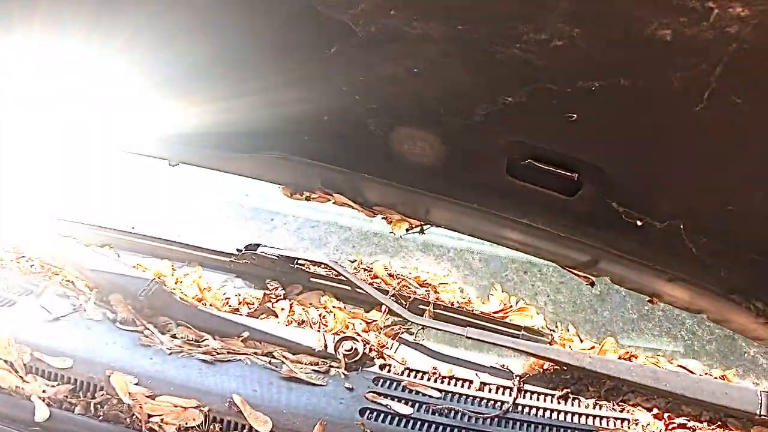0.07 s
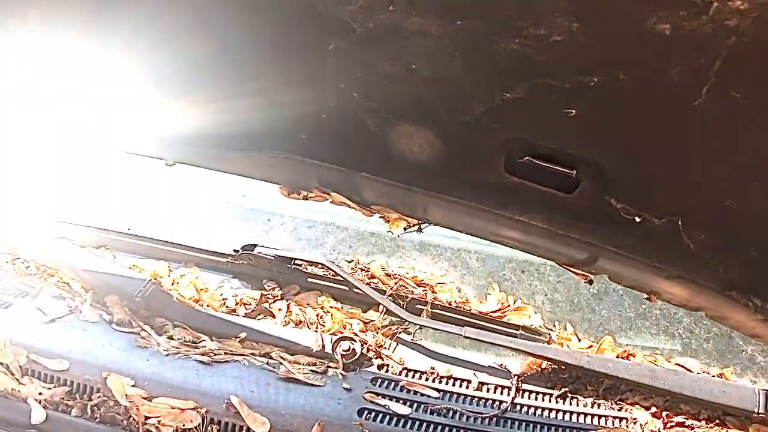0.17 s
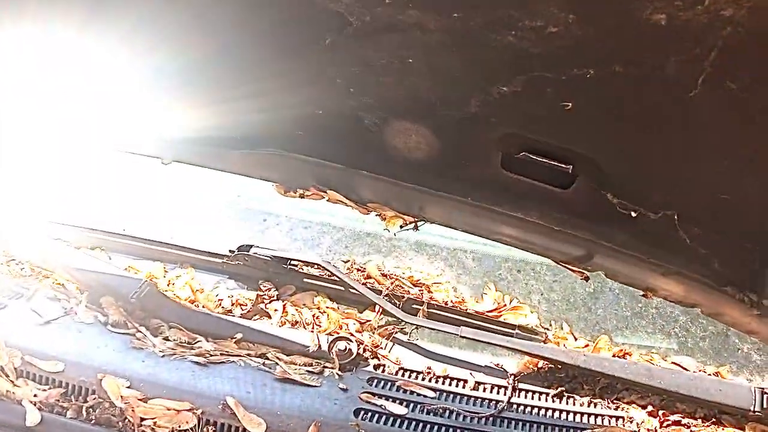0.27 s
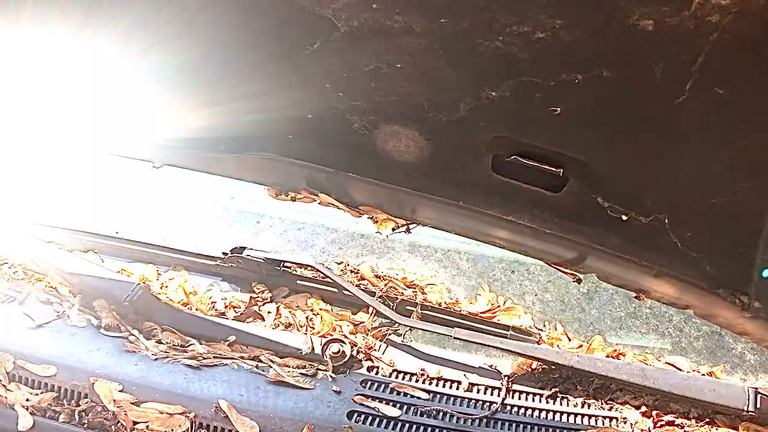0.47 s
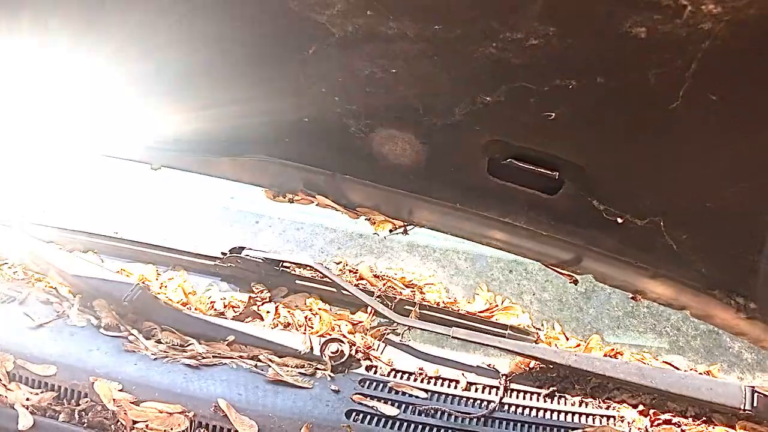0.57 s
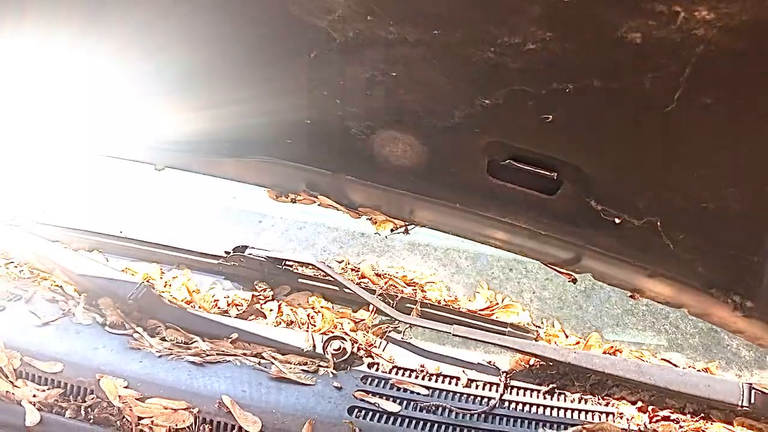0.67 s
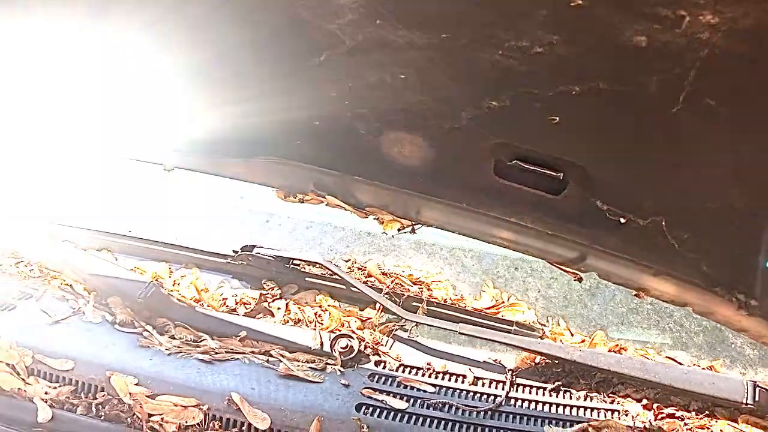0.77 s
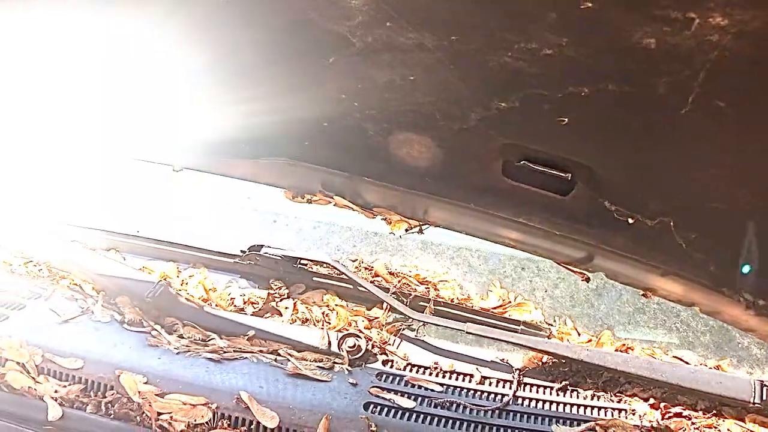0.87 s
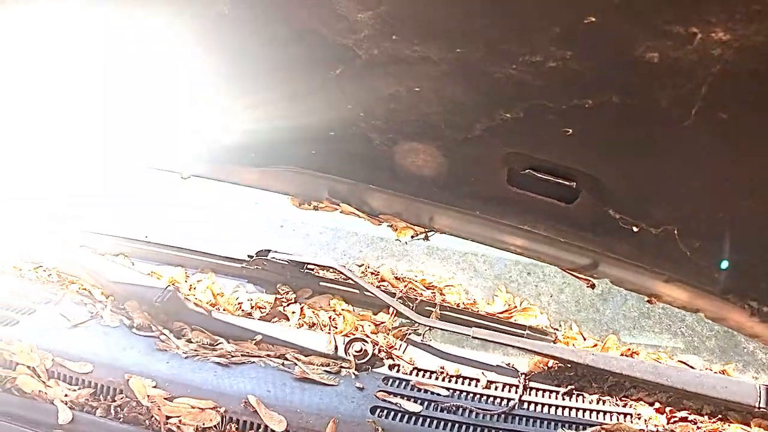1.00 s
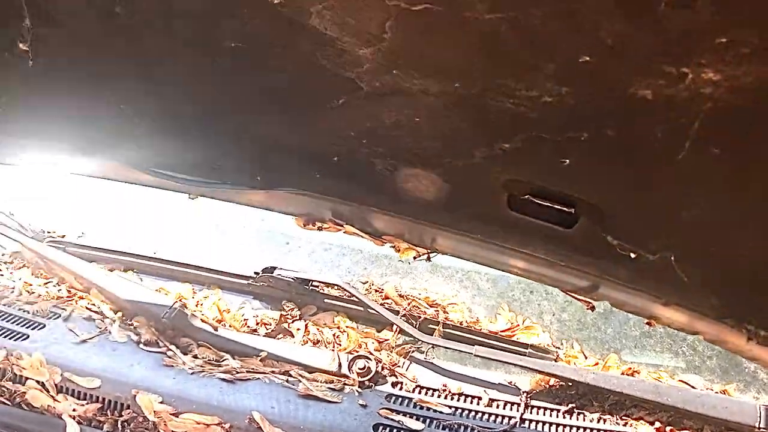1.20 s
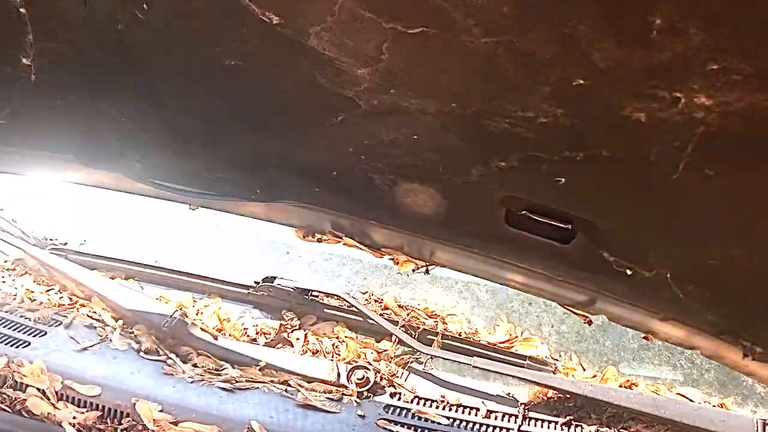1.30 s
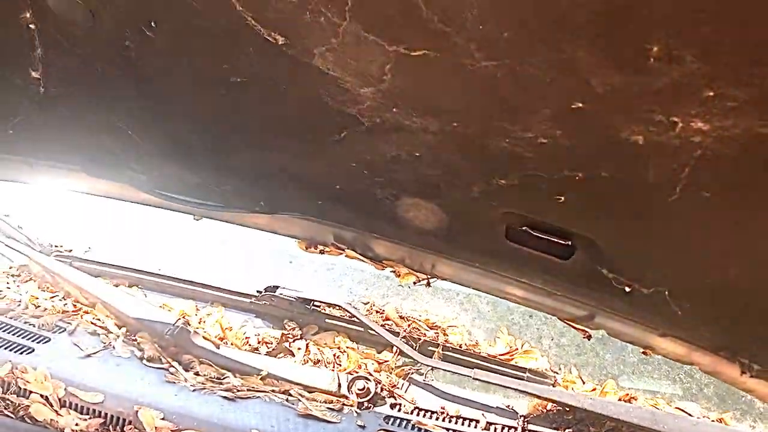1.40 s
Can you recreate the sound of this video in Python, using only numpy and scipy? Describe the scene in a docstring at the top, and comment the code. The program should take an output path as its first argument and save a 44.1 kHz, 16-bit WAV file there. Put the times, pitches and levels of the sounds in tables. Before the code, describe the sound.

A car hood moves close to the microphone: the dry hinge squeaks sharply, the metal panel clunks twice, then bumps softly several times. Behind it is a faint, low outdoor rumble.

```python
"""Car bonnet on a dry hinge

Outdoors, one microphone by the car. The hinge sticks and slips in one sharp squeak, then the panel
shudders, clunks and snaps into place, each blow ringing the same sheet-metal modes. Something slides
with a faint hiss, probably a strut, and a few soft knocks follow. Farther off, a machine hums and
small birds chirp over the low rumble of the open air."""
import sys
import numpy as np
from scipy import signal
from scipy.fft import rfft, irfft
from scipy.io import wavfile

SR = 44100
rng = np.random.default_rng(int(sys.argv[2]) if len(sys.argv) > 2 else 0)


def master_out(mix):
    """Clip the mix to full scale and print it as 16-bit PCM to the path in sys.argv[1]."""
    frames = np.transpose(np.atleast_2d(mix))
    ceiling = np.clip(frames, -1, 1)
    pcm = np.round(ceiling * 32767).astype(np.int16)
    wavfile.write(sys.argv[1], SR, pcm)


N = 63945
T = np.arange(N) / SR

# The hinge's stick-slip rate. Each row: time in seconds, pitch in Hz.
SLIP_RATE = [(.228, 2830), (.243, 2836), (.254, 2866), (.259, 2888), (.267, 2886), (.272, 2825),
             (.277, 2836), (.293, 2831), (.308, 2822), (.328, 2818)]
# Strength of the squeak. Each row: time in seconds, level in dB.
SLIP_LEVEL = [(.205, -70.5), (.224, -44.5), (.230, -14.5), (.237, -14), (.246, -15), (.266, -10.5),
              (.272, -15.5), (.280, -11), (.321, -14), (.327, -39.5), (.342, -42), (.385, -66.5)]
# The squeak's harmonics, lowest first. Each entry: level in dB against the fundamental.
SLIP_HARMONICS = [0, -4.5, -10, -26, -25.5]
# Reflections off panel and windscreen. Each row: delay in seconds, gain in dB.
REFLECTIONS = [(.0031, -19), (.0074, -25.5), (0.0126, -21.5), (0.019, -37)]
# Blows on the bonnet. Each row: time in seconds, ring drive in dB, rattle drive in dB,
# bass corner in Hz, treble corner in Hz, build-up in seconds.
BLOWS = [(.002, -26, -27, 85, 1204, 0.006), (.093, -35, -54, 80, 496, 0.012),
         (0.166, -37.5, -47.5, 250, 1300, 0.023), (.335, -25, -27, 250, 2130, .008),
         (.393, -6.5, -17, 370, 2660, 0.0055), (.470, -15.5, -29, 300, 1190, 0.0014),
         (0.865, -38, -50, 195, 2480, 0.00084), (.995, -42.5, -46.5, 179, 1618, .001),
         (1.078, -37, -49.5, 198, 1000, 0.0025), (1.145, -24, -49.5, 82, 330, .001),
         (1.178, -43.5, -46, 200, 1810, .005), (1.225, -16.5, -27.5, 68.6, 780, 0.00076),
         (1.268, -21.5, -34.5, 70, 306, 0.0058), (1.298, -23, -27.5, 61, 280, 0.004),
         (1.331, -28.5, -48, 81, 330, .004), (1.401, -21, -30.5, 113.4, 394, 0.0013)]
# The bonnet's main modes. Each row: frequency in Hz, relative level in dB, t60 in seconds.
PANEL_MODES = [(133.3, -9, .5), (177.6, -11, 0.36), (235.8, -18.5, 0.45), (286.2, -17, 0.25),
               (334.3, 3.5, 0.15), (401, -9.5, 0.097), (481.5, -9.5, .18), (774, -12.5, 0.16),
               (832.7, -4, 0.054), (997.5, -8.5, 0.093), (1473, -10.5, .07), (1681, -3.5, 0.069),
               (1905, -10, 0.067), (2214, -13, .07)]
# Dense ring of panel and loose fittings. Each row: frequency in Hz, density in dB, t60 in seconds.
RATTLE_SPECTRUM = [(60, -21, 0.29), (153, -7.5, 0.75), (360, 6, .2), (480, -5.5, .17), (665, -7.5, 0.2),
                   (870, -3, 0.1178), (1250, -9, 0.23), (1708, -13, 0.19), (2570, -15.5, 0.11),
                   (6000, -11, 0.059), (15000, -17, 0.045)]
# Dry scrapes in the hinge. Each row: peak time in seconds, level in dB, rise and t60 in seconds.
HINGE_SCRAPES = [(0.329, -36.5, 0.0041, 0.065), (0.391, -25.5, 0.0055, 0.046), (0.435, -49.5, 0.004, 0.076),
                 (0.468, -37.5, 0.0077, 0.042)]
# Colour of a scrape. Each row: frequency in Hz, relative density in dB.
SCRAPE_SPECTRUM = [(100, -32.5), (500, -20), (1300, 3.5), (3000, -2.5), (6000, -4), (10000, -7.5),
                   (15000, -14.5)]
# Sharp snaps of metal. Each row: time in seconds, level in dB.
METAL_SNAPS = [(0.4693, -13), (0.863, -43)]
# Colour of a snap. Each row: frequency in Hz, relative density in dB.
SNAP_SPECTRUM = [(70, -28), (300, 2), (1000, -12), (2200, 6), (4000, -1), (6500, -8.5), (9000, -18),
                 (15000, -30)]
# Strength of the sliding hiss. Each row: time in seconds, level in dB.
HISS_LEVEL = [(.46, -75), (.51, -55), (.60, -53), (.72, -53), (.80, -56), (.86, -62.5), (.90, -75)]
# Resonances of the sliding part. Each row: centre in Hz, width in Hz, relative level in dB.
HISS_MODES = [(1665, 37, 0.5), (2240, 300, 3), (2785, 61, -1), (3286, 53, 2), (3740, 300, -6.5),
              (5070, 200, -25), (6000, 290, -11.5), (7870, 880, -13), (8100, 610, -7), (10350, 380, -13.5)]
# Ticks of dry debris. Each row: time in seconds, level in dB.
DEBRIS_TICKS = [(1.020, -59.5), (1.074, -51.5), (1.136, -62), (1.191, -54), (1.229, -58)]
# Faint rubs, thin squeals and two light ticks. Each row: peak time and half-length in seconds,
# centre and half-width in Hz, level in dB.
RUBS_SQUEALS_TICKS = [(.221, .016, 1735, 60, -49), (.595, .07, 5660, 35, -61),
                      (1.052, .006, 6000, 350, -62), (1.12, .045, 3130, 60, -66),
                      (1.158, .005, 6000, 350, -60), (1.209, .010, 2350, 600, -50),
                      (1.41, .08, 4400, 1300, -60)]
# Distant birds. Each row: peak time in seconds, pitch in Hz, level in dB.
BIRD_CHIRPS = [(.122, 4730, -62.5), (.652, 4920, -65), (.698, 4870, -66), (.742, 4940, -65.5),
               (.912, 3910, -59.5), (1.058, 5010, -71), (1.105, 4980, -64.5), (1.156, 5010, -64),
               (1.428, 4970, -65)]
# Tones of the distant machine. Each row: frequency in Hz, level in dB.
MACHINE_TONES = [(95.5, -58), (189.5, -54.5)]
# Colour of the outdoor rumble. Each row: frequency in Hz, relative density in dB.
RUMBLE_SPECTRUM = [(25, -39.5), (45, -6), (86, -7.5), (200, -8), (350, -12.5), (450, -18), (760, -22.5),
                   (1400, -26.5), (2000, -29.5), (2750, -32.5), (4900, -34.5), (7000, -43), (16000, -53)]
# Strength of that rumble. Each row: time in seconds, level in dB.
RUMBLE_LEVEL = [(0, -56), (.2, -48), (.6, -53.5), (.95, -53.5), (1.1, -50), (1.3, -49), (1.45, -54.5)]


def from_db(db):
    """Decibels to gain."""
    return 10 ** (np.asarray(db) / 20)


def curve(rows):
    """Join (seconds, value) points by straight lines."""
    return np.interp(T, *np.transpose(rows))


def gain_curve(rows):
    """Gain from (seconds, dB) points, silent outside them."""
    return from_db(curve(rows)) * (T > rows[0][0]) * (T < rows[-1][0])


def shaped(gain):
    """Noise of rms 1 whose spectrum follows gain(frequency)."""
    hz = np.arange(N + 1) * SR / (2 * N) + 1e-3
    noise = irfft(rfft(rng.standard_normal(2 * N)) * gain(hz))[:N]
    return noise / np.sqrt(np.mean(noise ** 2) + 1e-20)


def at_hz(points, hz, column=1):
    """Read a column of a table on a log-frequency axis."""
    table = np.array(points)
    return np.interp(np.log(hz), np.log(table[:, 0]), table[:, column])


def coloured(points):
    """Noise of rms 1 with a (Hz, dB) spectrum."""
    return shaped(lambda hz: from_db(at_hz(points, hz)))


def drift(rate_hz):
    """Random wander of rms 1, mostly slower than rate_hz."""
    return shaped(lambda hz: 1 / (1 + (hz / rate_hz) ** 2))


def wavering_phase(hz, spread_hz, rate_hz):
    """Phase in radians of a tone whose pitch wanders around hz."""
    return 2 * np.pi * np.cumsum(hz + spread_hz * drift(rate_hz)) / SR


def swell(at, rise, t60):
    """Exponential rise to a moment, then exponential decay."""
    return np.exp(np.minimum((T - at) / rise, (at - T) * np.log(1000) / t60))


def bump(at, half_length):
    """Smooth rise and fall around a moment."""
    return np.exp(-2 * ((T - at) / half_length) ** 2)


def ring(force, hz, t60):
    """One mode: a unit click starts a decaying sine of height 1."""
    radius, angle = np.exp(-np.log(1000) / (t60 * SR)), 2 * np.pi * hz / SR
    return signal.lfilter([0, np.sin(angle)], [1, -2 * radius * np.cos(angle), radius ** 2], force + 1e-18)


def contact(hz, thin_hz, dull_hz):
    """Colour of a blow: a stiff spot gives little bass, a soft touch little treble."""
    return 1 / np.hypot(1, (hz / dull_hz) ** 2) / np.hypot(1, (thin_hz / hz) ** 2)


def hinge_squeak(second_hz=1538, jitter_hz=7.1, shimmer_db=1.25):
    """Stick-slip tone; a second mode grows late and adds side tones; close surfaces reflect it."""
    second_mode = swell(.309, rise=.013, t60=.076) * np.sin(wavering_phase(second_hz, jitter_hz, 160))
    phase = wavering_phase(curve(SLIP_RATE), jitter_hz, 160)
    phase += .17 * second_mode + .007 * drift(700)  # side tones and a slight rasp
    tone = sum(from_db(db + shimmer_db * np.sqrt(k) * drift(60)) * np.sin(k * phase)
               for k, db in enumerate(SLIP_HARMONICS, 1))
    direct = np.sqrt(2) * (gain_curve(SLIP_LEVEL) * tone + from_db(-33) * second_mode)
    return direct + sum(from_db(db) * np.interp(T - delay, T, direct) for delay, db in REFLECTIONS)


def bonnet_ring(gain_db=-9.5, chatter_db=-26, lag_at_1khz_s=.002047):
    """Every blow, a push with some chatter, rings the same modes; the low ones arrive last."""
    forces, out = [], 0
    for at, db, _, thin_hz, dull_hz, rise in BLOWS:
        force = from_db(chatter_db) * swell(at, rise, t60=.0073) * rng.standard_normal(N)
        force[int(at * SR)] += 1
        forces.append((from_db(db) * force, thin_hz, dull_hz))
    for k, (hz, db, t60) in enumerate(PANEL_MODES):
        drive = sum(force * contact(hz, thin_hz, dull_hz) * from_db(rng.normal(0, 1))
                    for force, thin_hz, dull_hz in forces)
        lag = lag_at_1khz_s * np.sqrt(1000 / hz)  # low bending waves travel more slowly
        mode = np.interp(T - lag, T, ring(drive, hz, t60))
        out += (-1) ** k * from_db(gain_db + db) * mode
    return out


def bonnet_rattle():
    """The crowd of weaker modes after each blow, dying sooner in the treble."""
    out = 0
    edges = 45 * 2 ** np.arange(0, 8.6, .5)  # half-octave bands, in Hz
    for low, high in zip(edges, edges[1:]):
        hz = np.sqrt(low * high)
        band = shaped(lambda f: (f > low) & (f <= high)) * np.sqrt((high - low) / 1000)
        t60 = at_hz(RATTLE_SPECTRUM, hz, column=2)
        power = sum((from_db(db) * contact(hz, thin_hz, dull_hz) * swell(at, rise, t60)) ** 2
                    for at, _, db, thin_hz, dull_hz, rise in BLOWS)
        out += from_db(at_hz(RATTLE_SPECTRUM, hz)) * band * np.sqrt(power)
    return out


def panel_flex(at=.358, hz=71.8):
    """The whole sheet flexes once with a low boom."""
    return from_db(-28.5) * swell(at, rise=.0027, t60=.21) * np.sin(2 * np.pi * hz * (T - at))


def hinge_scrapes(grain_db=3):
    """Dry friction in the hinge: short bursts of gritty noise."""
    envelope = sum(from_db(db) * swell(at, rise, t60) for at, db, rise, t60 in HINGE_SCRAPES)
    return envelope * coloured(SCRAPE_SPECTRUM) * from_db(grain_db * drift(600))


def metal_snaps(tail_db=-19):
    """Metal snaps into place: a hard crack with a weaker tail."""
    envelope = sum(from_db(db) * (swell(at, 1e-4, t60=.008) + from_db(tail_db) * swell(at, 1e-4, t60=.079))
                   for at, db in METAL_SNAPS)
    return envelope * coloured(SNAP_SPECTRUM)


def sliding_hiss(grain_db=1.5):
    """Smooth friction, probably in a strut, heard through narrow resonances."""
    hiss = shaped(lambda f: np.sqrt(sum(
        from_db(db) ** 2 / width / (1 + ((f * f - hz * hz) / (f * width)) ** 2)
        for hz, width, db in HISS_MODES)))
    return gain_curve(HISS_LEVEL) * hiss * from_db(grain_db * drift(140))


def debris_ticks(bright_hz=10940):
    """Dry debris ticks: tiny bursts of treble noise."""
    envelope = sum(from_db(db) * swell(at, rise=2e-4, t60=.015) for at, db in DEBRIS_TICKS)
    return envelope * shaped(lambda f: np.minimum(f / bright_hz, 1))


def rubs_squeals_ticks():
    """Brief bands of noise: faint rubs, thin squeals where narrow, two light ticks where shortest."""
    return sum(from_db(db) * bump(at, half_length) * shaped(lambda f: (1 + ((f - hz) / width) ** 2) ** -2)
               for at, half_length, hz, width, db in RUBS_SQUEALS_TICKS)


def distant_birds(fall_hz_per_s=12000):
    """Short, wavering, falling chirps, far from the microphone."""
    waver = wavering_phase(0, spread_hz=70, rate_hz=200)
    out = 0
    for at, hz, db in BIRD_CHIRPS:
        glide = 2 * np.pi * (T - at) * (hz - fall_hz_per_s * (T - at) / 2)
        out += from_db(db) * bump(at, half_length=.013) * np.sin(glide + waver)
    return np.sqrt(2) * out


def distant_machine(waver_db=2.5):
    """A machine hums some way off: two low tones, unsteady in level and pitch."""
    return np.sqrt(2) * sum(
        from_db(db + waver_db * drift(4.8)) * np.sin(wavering_phase(hz, spread_hz=2, rate_hz=8))
        for hz, db in MACHINE_TONES)


def open_air():
    """The low rumble of the place, ebbing and returning."""
    return from_db(curve(RUMBLE_LEVEL)) * coloured(RUMBLE_SPECTRUM)


def scene():
    """The car close by and the background beyond it, at one microphone."""
    bonnet = hinge_squeak() + bonnet_ring() + bonnet_rattle() + panel_flex()
    contacts = hinge_scrapes() + metal_snaps() + sliding_hiss() + debris_ticks() + rubs_squeals_ticks()
    background = distant_birds() + distant_machine() + open_air()
    return (bonnet + contacts + background)[None]


def record(dry, low_cut_hz=45, high_cut_hz=16000):
    """The microphone channel: a gentle low cut and a steep cut at the top."""
    low_cut = signal.butter(2, low_cut_hz, "high", fs=SR, output="sos")
    high_cut = signal.ellip(10, .2, 80, high_cut_hz, fs=SR, output="sos")
    return signal.sosfilt(high_cut, signal.sosfilt(low_cut, dry))


dry = scene()
out = record(dry)
master_out(out)
```